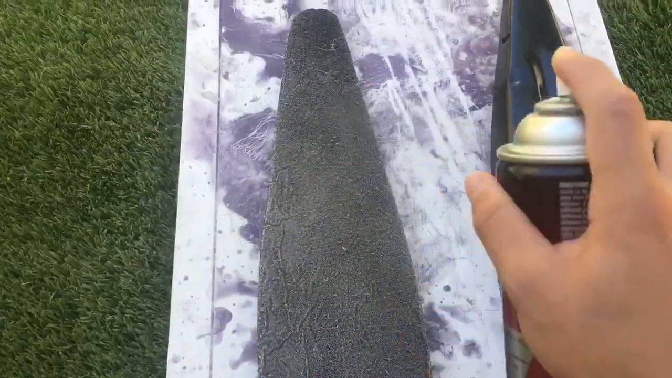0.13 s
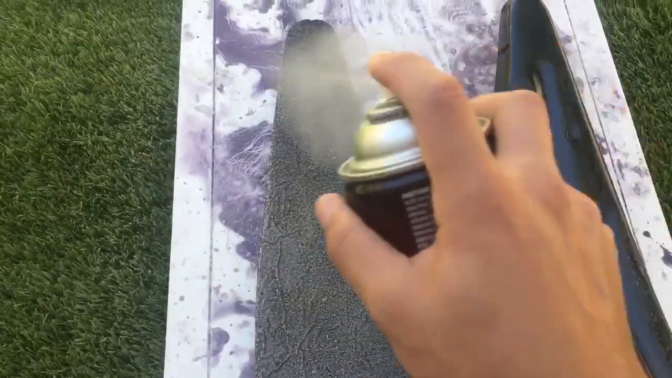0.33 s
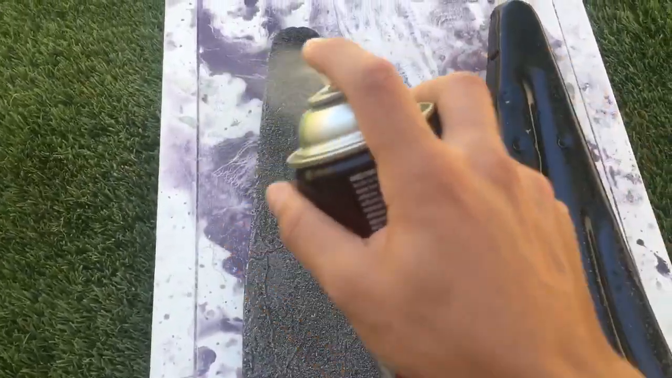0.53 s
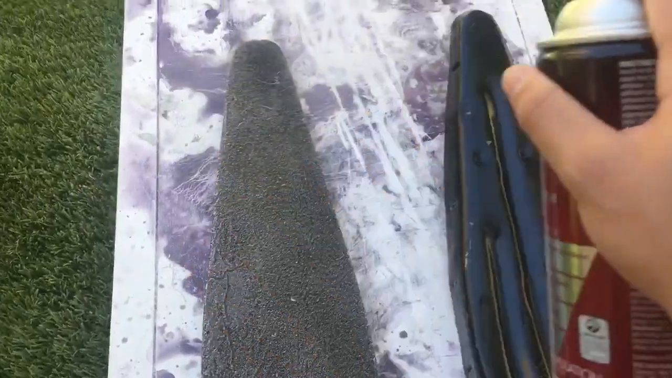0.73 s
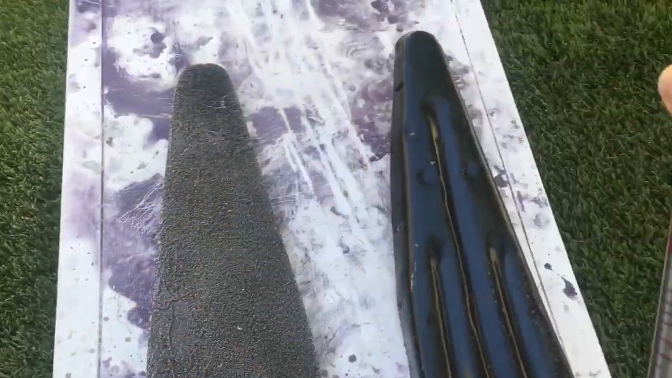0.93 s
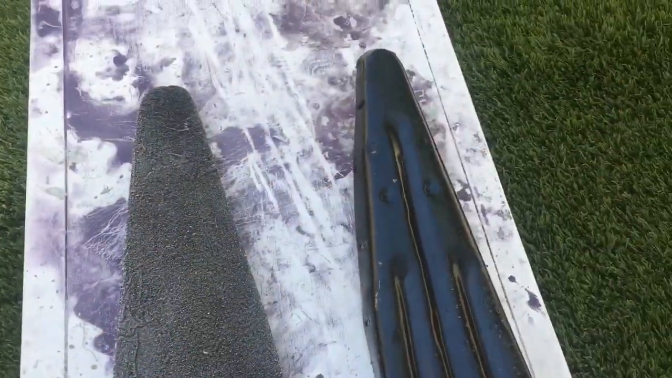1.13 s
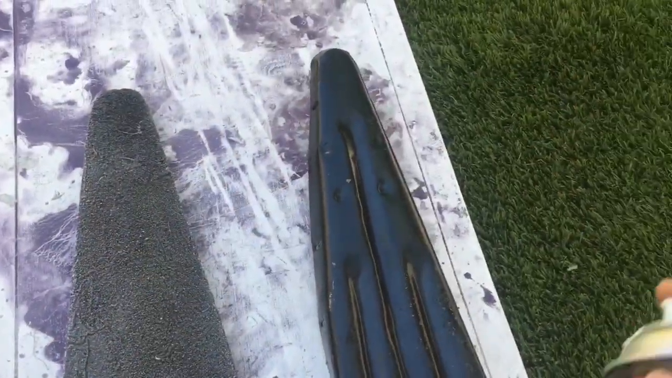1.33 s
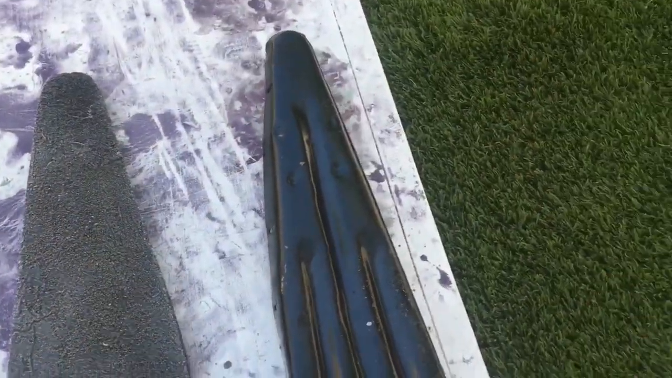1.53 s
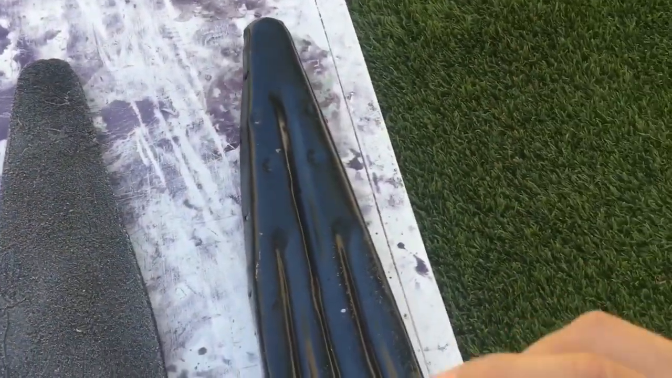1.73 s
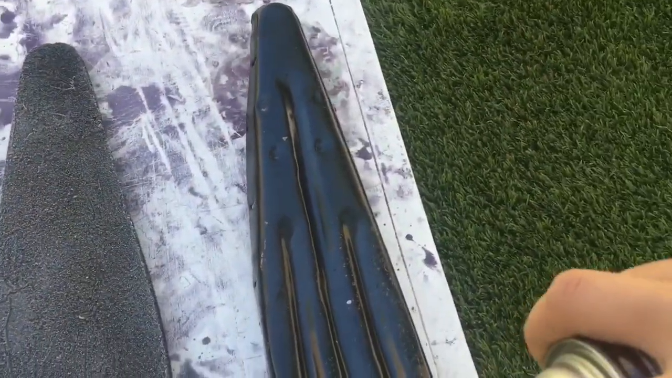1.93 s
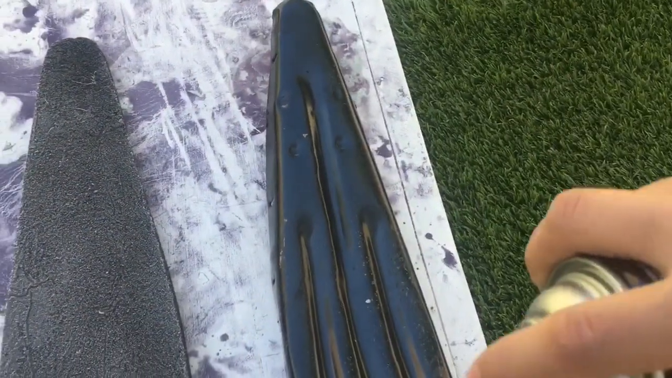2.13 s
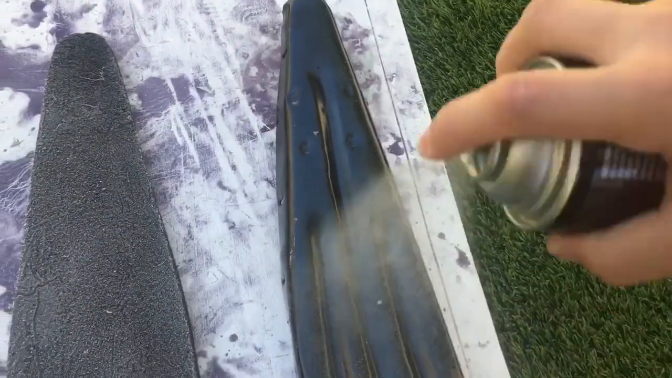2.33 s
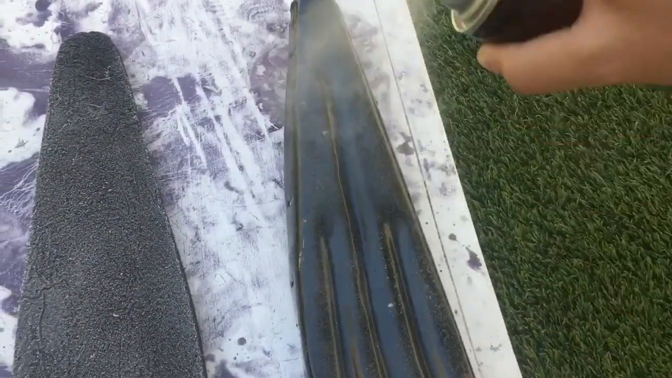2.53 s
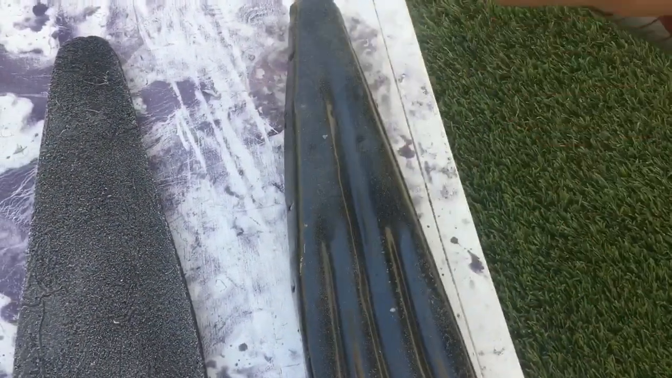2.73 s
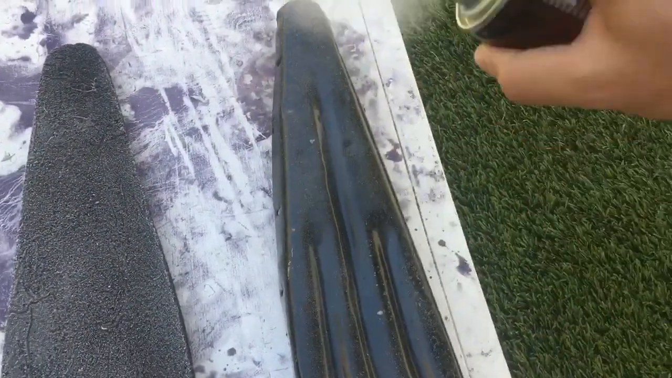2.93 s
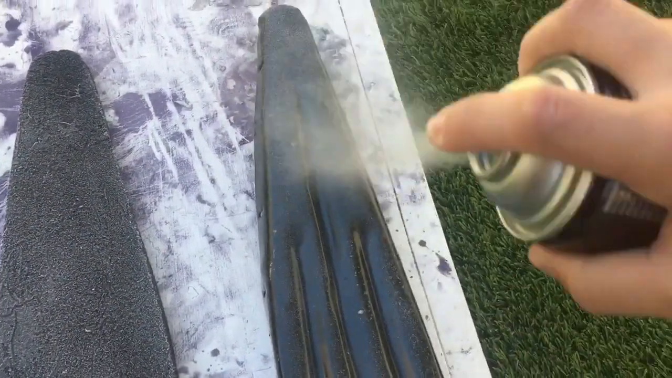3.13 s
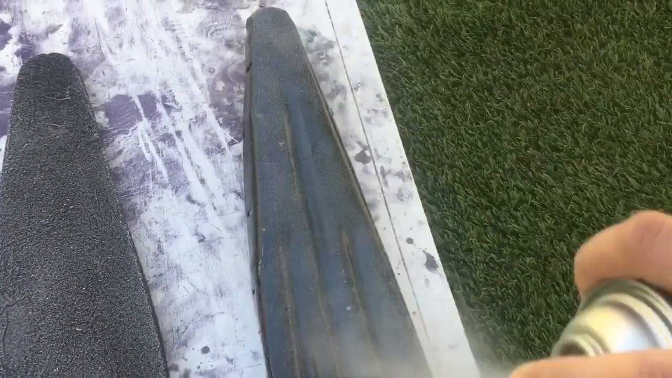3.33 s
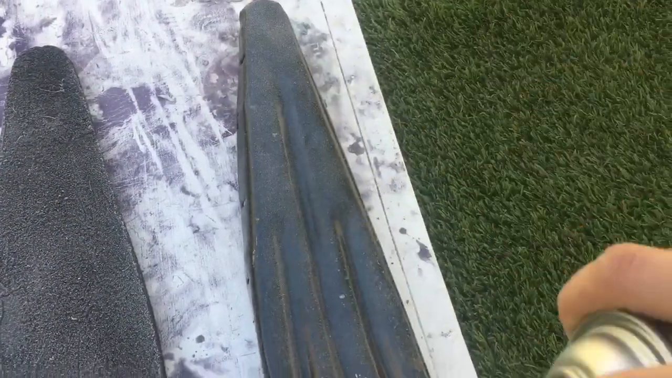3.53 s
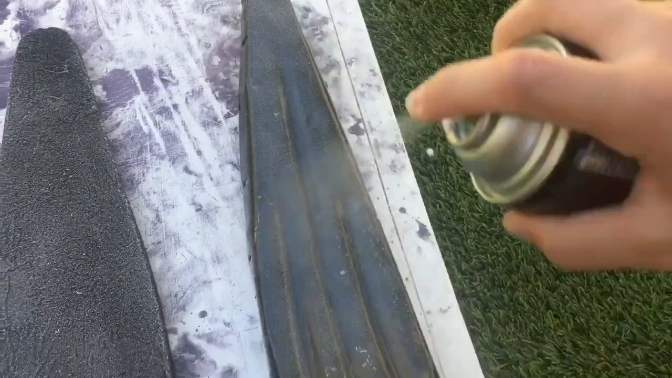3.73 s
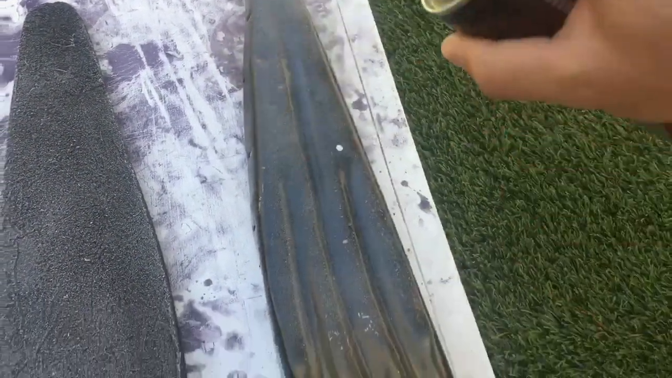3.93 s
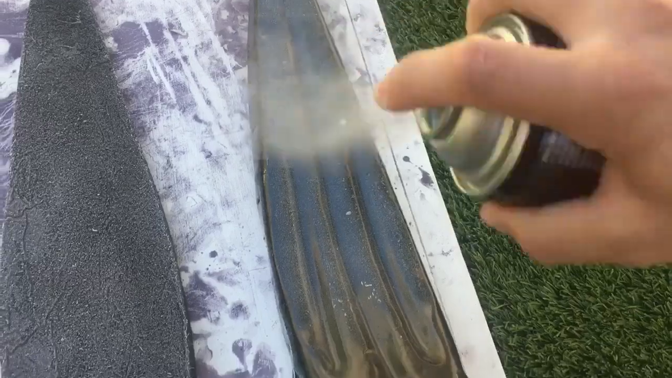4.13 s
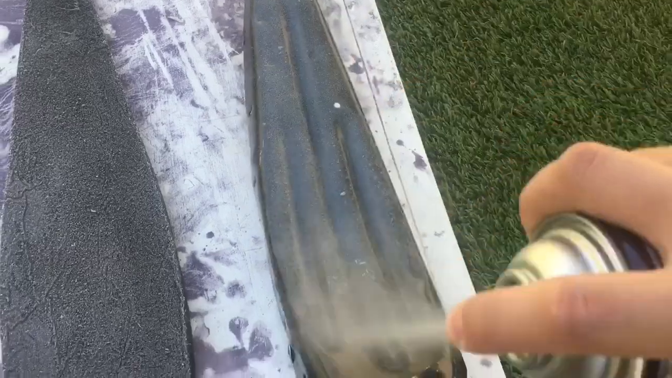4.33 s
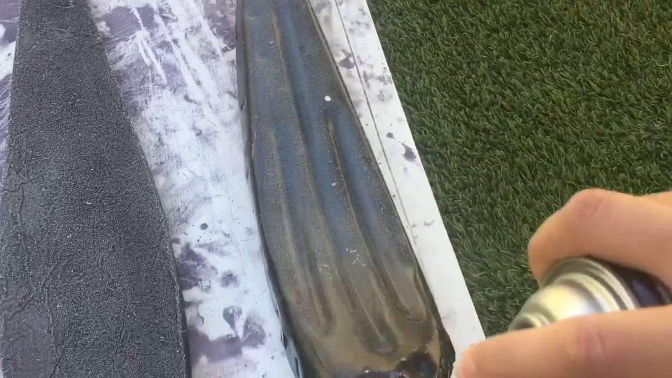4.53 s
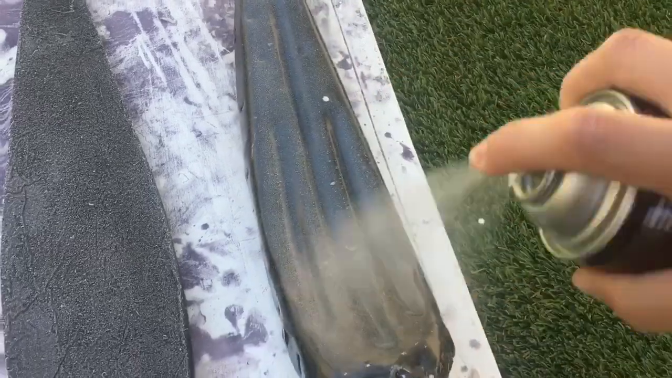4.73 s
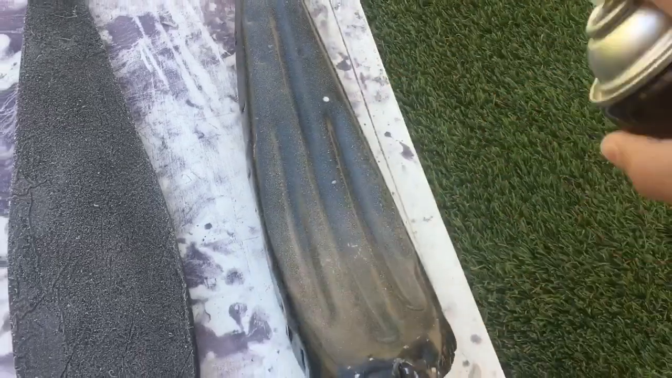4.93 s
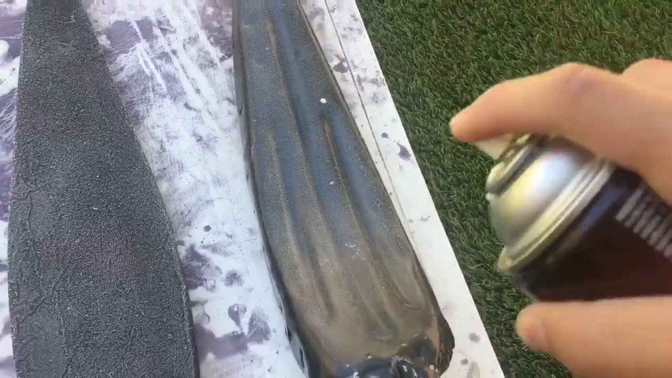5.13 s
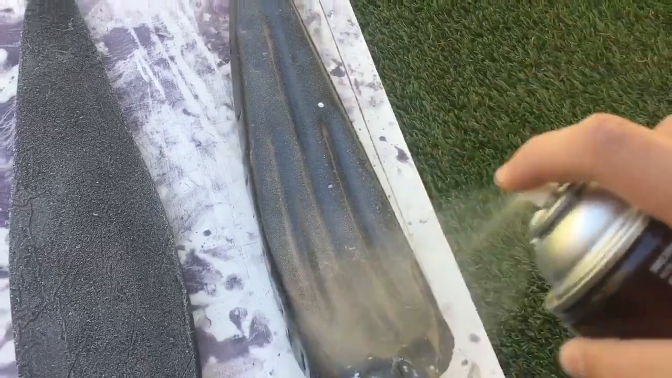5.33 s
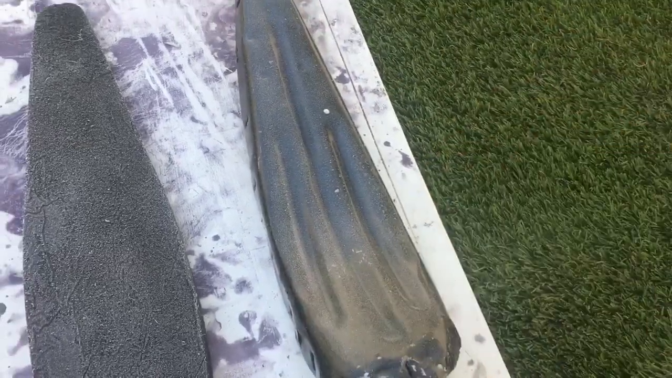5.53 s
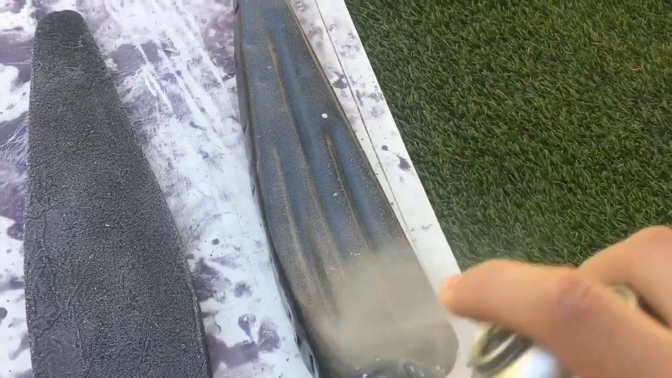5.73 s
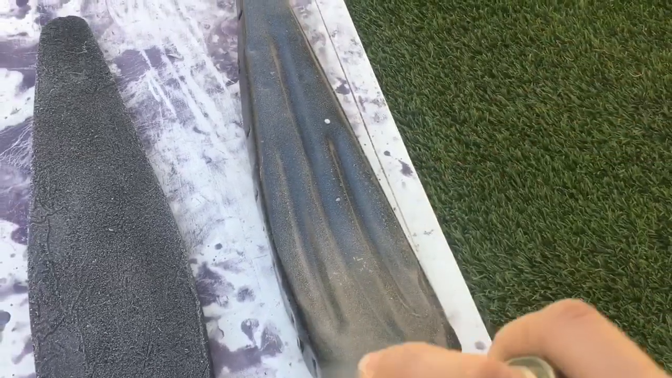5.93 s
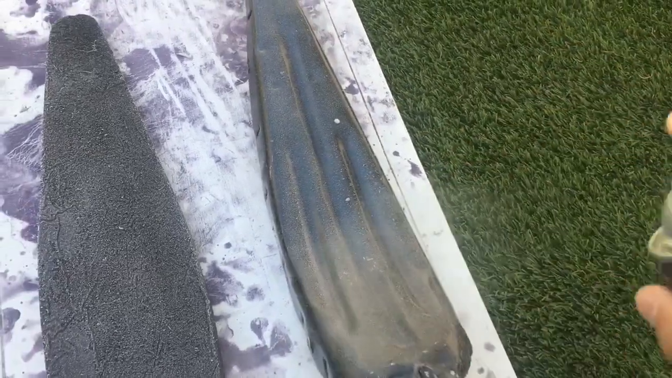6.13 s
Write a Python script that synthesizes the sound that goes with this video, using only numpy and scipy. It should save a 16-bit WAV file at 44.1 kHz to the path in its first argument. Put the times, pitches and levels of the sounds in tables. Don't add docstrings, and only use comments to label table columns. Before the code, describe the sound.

An aerosol can gives three short bright hisses, with a sharp metallic knock and hollow bump during the first. A pause of about a second and a half holds only soft grass rustles. Then two longer sprays of half a second and a run of shorter bursts follow, their tone sliding as the can moves. Outdoors, close phone microphone, faint machine hum and distant traffic rumble.

```python
import sys
import numpy as np
from scipy import signal
from scipy.fft import rfft, irfft, next_fast_len
from scipy.io import wavfile
from scipy.ndimage import uniform_filter1d

SR = 44100
rng = np.random.default_rng(int(sys.argv[2]) if len(sys.argv) > 2 else 0)


def level_to_linear(level):
    exponent = np.asarray(level, float) / 20
    return 10 ** exponent


def pcm_store(signal):
    levels = np.round(np.clip(np.atleast_2d(signal), -1, 1) * 32767)
    wavfile.write(sys.argv[1], SR, levels.astype(np.int16).T)


N = 272890
TIME = np.arange(N) / SR

# valve opens in seconds, finger lifts in seconds, valve seats in seconds,
# flow in dB, swell while held in dB.
PRESSES = [(-.1, 0.009, .04, -34, -1), (0.196, 0.321, 0.352, -35, 1.5), (0.494, 0.592, 0.64, -33.5, -0.5),
           (2.143, 2.625, 2.663, -32, -1), (2.787, 3.318, 3.352, -33.5, 2.5),
           (3.552, 3.634, 3.76, -30.5, 0.5), (3.737, 3.787, 3.83, -33.5, -0.5),
           (4.001, 4.316, 4.382, -33, 2.5), (4.566, 4.732, 4.758, -29.5, -4),
           (5.222, 5.366, 5.394, -33, -1), (5.59, 5.726, 5.747, -35.5, 1.5),
           (5.908, 6.042, 6.06, -31.5, -2)]
# time in seconds, level in dB.
PUFFS = [(.369, -51), (2.672, -46), (3.363, -44.5), (4.391, -60), (4.783, -57)]
# frequency in Hz, level in dB per Hz.
JET_COLOUR = [(500, -18), (900, -9), (1300, -5), (1800, -1), (2400, 3), (3400, 1.5), (4300, 0), (5300, 0.5),
              (6100, 0), (7000, 2), (8800, 2.5), (11000, -1), (13200, -5), (14500, -0.5), (16500, -5)]
JET_BANDS = [
    (4500, 10000),
    (1800, 4500),
    (10000, 15800),
    (900, 1800),
]
# time in seconds, jet striking the board in dB, mouth facing microphone in dB.
AIM = [(0, -2.5, -3.5), (.26, -5, -6), (.58, -1.5, -3.5), (2.16, -4, -2.5), (2.34, -4.5, -4),
       (2.49, -8, -7), (2.87, -7, -7), (2.98, -7.5, -2.5), (3.26, -7, -1), (3.6, -5.5, -1),
       (3.71, -4, -5.5), (3.76, -2.8, -3), (4.05, -5.5, -2.5), (4.25, -7, -4), (4.65, -6, -2.5),
       (5.3, -4.5, -4), (5.66, -2.5, -6), (6, -0.6, -8)]
# time in seconds, delay in ms, share from 0 to 1.
HAND = [(.01, .28, .3), (.27, .285, .45), (.55, .268, .35), (2.2, .218, .42), (2.4, .168, .5),
        (2.55, .15, .15), (2.63, .139, .35), (2.92, .155, .2), (3.1, .214, .4), (3.2, .232, .75),
        (3.34, .24, .55), (3.72, .225, .55), (3.745, .33, .3), (4.1, .215, .15), (4.27, .234, .75),
        (4.65, .224, .55), (5.26, .285, .3), (5.8, .297, .3)]
# time in seconds, board delay in ms, board share from 0 to 1,
# ground delay in ms, ground share from 0 to 1.
BELOW = [(.01, 1.1, .3, 1.34, .1), (.23, 1.08, .08, 1.426, .1), (.3, 1.21, .18, 1.44, .12),
         (.56, 1.25, .2, 1.46, .08), (2.18, 1.241, .03, 1.498, .1), (2.38, 1.18, .05, 1.45, .17),
         (2.47, 1.132, .17, 1.41, .24), (2.63, 1.081, .35, 1.345, .34), (2.83, 1.101, .31, 1.365, .38),
         (2.92, 1.132, .27, 1.41, .27), (3.1, 1.22, .1, 1.499, .17), (3.32, 1.2, .08, 1.49, .12),
         (3.6, 1.33, .12, 1.46, .2), (3.78, 1.52, .1, 1.574, .12), (4.1, 1.2, .05, 1.5, .12),
         (6.03, 1.2, .06, 1.5, .06)]
# time in seconds, delay in ms, share from 0 to 1.
GLINT = [(0, 1.2, .25), (.2, 1.3, .2), (.3, 1.1, .25), (.6, 1.1, .25), (2.2, 1.56, .3), (2.3, 1.5, .25),
         (2.38, 1.32, .35), (2.45, 1.24, .25), (2.6, 1.18, .2), (2.82, 1.25, .35), (2.9, 1.03, .3),
         (2.97, 1.1, .35), (3.05, 1.2, .12), (3.3, 1.45, .15), (4.1, 1.5, .22), (5.25, 1.5, .25),
         (5.4, 1.5, .1), (6.05, 1.65, .2)]
# frequency in Hz, gain in dB.
MICROPHONE = [(2600, 0), (2900, -2.5), (3300, 0.5), (4500, -1), (4930, -2.5), (5400, 0.5), (7800, -1),
              (9000, 3), (9500, -1.5), (10050, -2.5), (10350, -5), (10900, -0.5), (11200, 1)]
# time in seconds, crack in dB, ring in dB.
KNOCK = [
    (0.0742, -28.5, -29),
    (0.0839, -35, -45),
]
# frequency in Hz, level in dB, time to fall 60 dB in seconds.
CRACK = [(150, -40, .09), (260, 1, 0.046), (600, 0, 0.14), (1120, -5, 0.22), (1420, -8, 0.12),
         (5200, -14.5, 0.16), (7500, -13, 0.083), (16000, -36, .05)]
# frequency in Hz, level in dB, time to fall 60 dB in seconds.
METAL = [(1750, -14, .25), (1825, -9, .14), (2401, -7, .2), (2697, -11, .15), (2902, -13, .18),
         (3273, -17, .24), (3591, -11, .5), (3779, -6, .22), (4339, -20, .3), (4409, -16, .29),
         (4500, -8, .26), (5066, -5, .07), (5152, -8, .18), (5324, -7, .14)]
# time in seconds, pitch in Hz, level in dB.
HOLLOW = [(.076, 330, -40), (.078, 300, -17), (.086, 275, -19), (.092, 340, -18), (.098, 400, -23),
          (.108, 410, -20), (.114, 400, -38), (.16, 360, -60), (.2, 360, -120)]
# time in seconds, level in dB, pitch in Hz, seconds to fall 60 dB.
PINGS = [(.0762, -27, 1150, .03), (.0843, -8.5, 880, .016), (.0846, -27, 770, .13), (.0905, -22, 921, .1),
         (.0846, -28, 1125, .14), (.198, -32, 3400, .02), (2.7228, -31, 2250, .022), (4.936, -37, 400, .04),
         (4.935, -45, 1950, .02)]
# starts in seconds, loudest in seconds, ends in seconds, level in dB,
# share of dull sole scuff from 0 to 1.
SHUFFLE = [
    (1.1, 1.21, 1.39, -56.5, .1),
    (1.22, 1.317, 1.44, -59.5, .1),
    (1.345, 1.422, 1.64, -58, .1),
    (1.602, 1.63, 1.68, -54, .1),
    (3.41, 3.442, 3.55, -49, .8),
    (4.923, 4.94, 5.05, -47, .85),
]
# frequency in Hz, level in dB per Hz.
GRASS = [(500, -30), (1200, -5), (2500, -6), (5000, -3), (8500, -8.5), (12000, -7), (16000, -21)]
# frequency in Hz, level in dB per Hz.
SOLE = [(300, -25), (900, -4), (2000, 3), (5000, -8), (9000, -17), (16000, -30)]
# multiple of the shaft speed, level in dB.
HUM = [(11, -65), (12, -69.5), (15, -62), (16, -60), (17, -62.5), (18, -71.5), (21, -74), (25, -71),
       (29, -68), (34, -69), (49, -70), (58, -76), (61, -73), (76, -74), (102, -78)]
# multiple of the shaft speed, peak in seconds, rise in seconds,
# fall in seconds, level in dB.
WHINE = [(90, 2.1, .6, .5, -70), (92, 1.77, .2, .2, -74), (89, 1.74, .15, .15, -76),
         (93, 1.82, .12, .12, -77), (90, 4.5, .4, .6, -71), (76, 5.7, .4, .3, -74),
         (52, 5.85, .35, .25, -61)]
# centre in Hz, width in Hz, level in dB.
DRONE = [(50.7, 7.7, -51.5), (74.6, 13, -51.5), (96.5, 5.2, -49), (120.5, 5.4, -50.5), (138.2, 6.5, -61.5),
         (163, 9.2, -49.5), (189.6, 5.5, -51), (213, 9.6, -55.5), (295, 6.8, -54.5), (361.7, 16, -62)]
# frequency in Hz, level in dB per Hz.
TRAFFIC = [(13, -50), (25, -25), (33, -17), (48, -4), (75, -7), (102, -5), (150, -7.5), (190, -3.5),
           (258, -5.5), (293, -7.5), (325, -15), (440, -33), (750, -120)]
# frequency in Hz, level in dB per Hz.
YARD = [(190, -34), (320, -7), (390, -0.5), (480, -2.5), (570, -7.5), (700, -5), (800, -7.5), (1100, -8),
        (1700, -14), (2400, -18), (3600, -21.5), (5300, -24), (9000, -31), (16500, -42.5)]


def unit(x):
    return x / np.sqrt(np.mean(x ** 2) + 1e-20)


def along(points, hz):
    f, *columns = np.transpose(points)
    return [np.interp(np.log(hz + 1), np.log(f + 1), c) for c in columns]


def curves(rows, t=TIME):
    s, *columns = np.transpose(rows)
    return [np.interp(t, s, c) for c in columns]


def wobble(rate):
    knots = rng.standard_normal(int(N * rate / SR) + 2)
    return np.interp(TIME * rate, np.arange(len(knots)), knots)


def shaped(x, gain, patchy_db=0):
    hz, t, z = signal.stft(x, SR, nperseg=512)
    patches = uniform_filter1d(rng.standard_normal(z.shape), size=5, axis=0)
    patches = uniform_filter1d(patches, size=8, axis=1)
    z = z * gain(hz[:, None], t[None]) * level_to_linear(patchy_db * unit(patches))
    return signal.istft(z, SR, nperseg=512)[1][:len(x)]


def noise(colour, patchy_db):
    m = next_fast_len(N + 8192)
    white = shaped(rng.standard_normal(N), lambda hz, t: 1, patchy_db)
    gain = level_to_linear(along(colour, np.fft.rfftfreq(m, 1 / SR))[0])
    return unit(irfft(rfft(white, m) * gain, m)[:N])


def damped(db, hz, t60, t):
    return level_to_linear(db - 60 * t / t60) * np.sin(2 * np.pi * hz * t)


def spray():
    spit = level_to_linear(0.46 * wobble(900) + 0.6 * wobble(120))

    def aim(hz, t):
        colour = level_to_linear(along(JET_COLOUR, hz)[0]) * paths(hz, t)
        power = abs(colour * level_to_linear(along(MICROPHONE, hz)[0])) ** 2 / len(hz)
        heard_db = np.array([10 * np.log10(power[(hz[:, 0] > lo) & (hz[:, 0] < hi)].sum(axis=0))
                             for lo, hi in JET_BANDS])
        strike_db, mouth_db = curves(AIM, t)
        _, fresh, ease = [c[None] for c in valve(t[0])]
        strike_db = strike_db + 5.5 * fresh
        thin_db = 1.5 * np.sqrt(ease)
        splash_db = -9.5 + 1.47 * strike_db
        wanted_db = np.array([0 * t, strike_db + thin_db, mouth_db + thin_db, splash_db])
        core, roar, fizz, splash = wanted_db - heard_db[:, None]
        lowest = 1 / (1 + (hz / 1800) ** 10)
        low = 1 / (1 + (hz / 4500) ** 10)
        high = 1 / (1 + (10000 / (hz + 1)) ** 20)
        band_db = lowest * splash + (low - lowest) * roar + (1 - low - high) * core + high * fizz
        return colour * level_to_linear(band_db)

    jet = shaped(unit(spit * rng.standard_normal(N)), aim, patchy_db=1.1)
    coarse = TIME[::16]
    return jet * np.interp(TIME, coarse, valve(coarse)[0])


def valve(t):
    opens, lifts, seats, db, swell_db = np.transpose(PRESSES)[..., None]
    snap_s, build_s, build_db = 0.0066, 0.014, 6
    ease_db, ease_bend = 12, 1.27
    seat_db, seat_s, tail_db_per_s = 13.5, 0.0099, 240
    fresh_s, puff_s = 0.023, 0.0046
    age = np.clip(t - opens, 0, None)
    shut = np.clip(t - seats, 0, None)
    ease = np.clip((t - lifts) / (seats - lifts), 0, 1)
    held_db = db + swell_db * np.clip(age / (lifts - opens), 0, 1) - build_db * np.exp(-age / build_s)
    lost_db = ease_db * ease ** ease_bend + seat_db * (1 - np.exp(-shut / seat_s)) + tail_db_per_s * shut
    gain = np.clip(age / snap_s, 0, 1) ** 2 * level_to_linear(held_db - lost_db)
    fresh = np.exp(-abs(t - opens) / fresh_s).max(axis=0)
    loudest = gain.argmax(axis=0)[None]
    puffs = sum(level_to_linear(level) * np.exp(-.5 * ((t - s) / puff_s) ** 2) for s, level in PUFFS)
    ease = np.take_along_axis(ease, loudest, axis=0)[0] * (1 - fresh)
    return np.hypot(gain.max(axis=0), puffs), fresh, ease


def paths(hz, t):
    hand_ms, hand = curves(HAND, t)
    board_ms, board, ground_ms, ground = curves(BELOW, t)
    glint_ms, glint = curves(GLINT, t)

    def late(ms):
        return np.exp(-2j * np.pi * hz * ms / 1000)

    fingers = 1.2 / (1 + (4000 / (hz + 1)) ** 4) / (1 + (hz / 11000) ** 4)
    treble = 1 / (1 + (9400 / (hz + 1)) ** 8)
    rough = 1.9 * (1 - treble) / (1 + (3300 / (hz + 1)) ** 2)
    near = fingers * hand * late(hand_ms) + 1.7 * treble * glint * late(glint_ms)
    return 1 + near + rough * (board * late(board_ms) + ground * late(ground_ms))


def knock():
    out, t = np.zeros(N), np.arange(SR // 2) / SR
    level_db, life = along(CRACK, np.fft.rfftfreq(512, 1 / SR)[:, None])
    for s, crack_db, ring_db in KNOCK:
        crack = shaped(rng.standard_normal(len(t)), lambda hz, u: level_to_linear(level_db - 60 * u / life))
        ring = sum(damped(db, hz, t60, t) for hz, db, t60 in METAL)
        onset = 1 - np.exp(-t / 0.0012)
        out[round(s * SR):][:len(t)] += onset * (level_to_linear(crack_db + 20) * crack + level_to_linear(ring_db) * ring)
    return out


def box():
    hz, db = curves(HOLLOW)
    return level_to_linear(db) * (TIME > HOLLOW[0][0]) * np.sin(2 * np.pi * np.cumsum(hz) / SR)


def pings():
    out, t = np.zeros(N + SR), np.arange(SR // 4) / SR
    for s, db, hz, t60 in PINGS:
        out[round(s * SR):][:len(t)] += damped(db, hz, t60, t)
    return out[:N]


def shuffle():
    strokes = []
    for start, peak, end, db, _ in SHUFFLE:
        fall_db = 15.5 * np.interp(TIME, [start, peak, end], [1, 0, 1])
        strokes.append(level_to_linear(db - fall_db) * (TIME > start) * (TIME < end))
    strokes = np.array(strokes)
    dull = np.transpose(SHUFFLE)[4]
    blades, soles = uniform_filter1d([(1 - dull) @ strokes, dull @ strokes], size=400)
    clumps = level_to_linear(1.8 * wobble(70) + 2.4 * wobble(500))
    grass = blades * unit(clumps * noise(GRASS, patchy_db=2))
    scuff = soles * unit(clumps * noise(SOLE, patchy_db=1.5))
    return level_to_linear(2.0) * (grass + scuff)


def compressor():
    shaft_hz = 58.95
    turn = 2 * np.pi * np.cumsum(shaft_hz * (1 + 0.00043 * wobble(1.99))) / SR
    out = np.zeros(N)
    for k, db in HUM:
        out += np.sqrt(2) * level_to_linear(db + 2.4 * wobble(9)) * np.sin(round(k) * turn + 6 * rng.random())
    for k, peak, rise, fall, db in WHINE:
        swell_db = db - 10 * ((TIME - peak) / np.where(TIME < peak, rise, fall)) ** 2
        out += np.sqrt(2) * level_to_linear(swell_db + 1.5 * wobble(9)) * np.sin(k * turn)
    return out


def drone():
    m = next_fast_len(N)
    hz = np.fft.rfftfreq(m, 1 / SR)[:4000]
    random_phase = np.exp(2j * np.pi * rng.random(len(hz)))
    spectrum = np.zeros(len(hz))
    for centre, width, db in DRONE:
        band = np.exp(-.5 * ((hz - centre) / width * 2) ** 2)
        spectrum += level_to_linear(db) * band / np.linalg.norm(band)
    return irfft(spectrum * random_phase, m)[:N] * m / np.sqrt(2)


def outdoors():
    traffic_db = -42.5 + .8 * wobble(2.5)
    traffic = level_to_linear(traffic_db) * noise(TRAFFIC, patchy_db=0.26)
    return traffic + level_to_linear(-47.5) * noise(YARD, patchy_db=1.3)


def scene():
    can = spray() + knock() + box() + pings()
    background = shuffle() + compressor() + drone() + outdoors()
    return np.tile(can + background, (2, 1))


def low_pass(x):
    return signal.sosfilt(signal.butter(12, 16880, fs=SR, output="sos"), x)


def record(dry):
    m = next_fast_len(N + 4096)
    hz = np.fft.rfftfreq(m, 1 / SR)
    top_cut_db = 62 * np.clip((hz - 15820) / 120 + .5, 0, 1) ** 2
    gain = level_to_linear(along(MICROPHONE, hz)[0] - top_cut_db)
    mix = irfft(rfft(dry, m) * gain, m)[:, :N]
    return low_pass(mix)


dry = scene()
out = record(dry)
pcm_store(out)
```